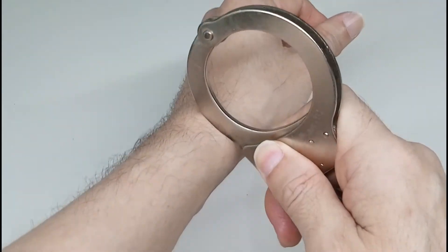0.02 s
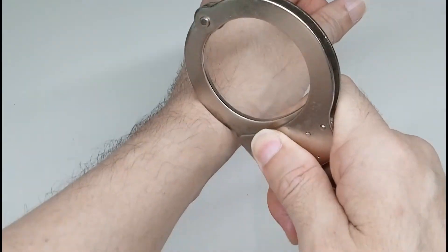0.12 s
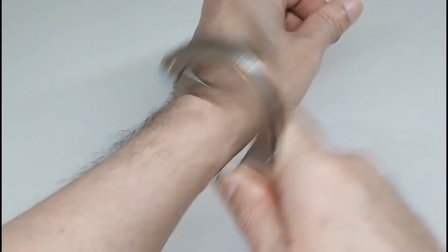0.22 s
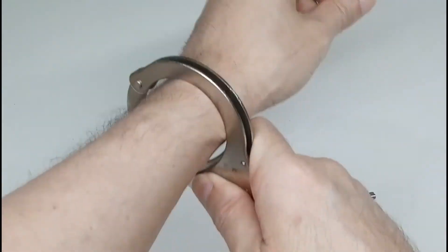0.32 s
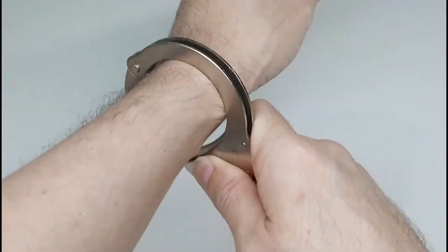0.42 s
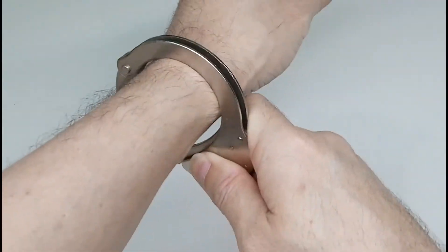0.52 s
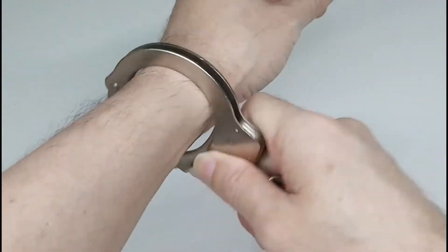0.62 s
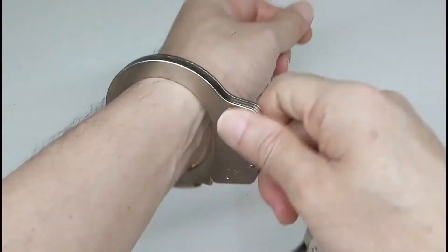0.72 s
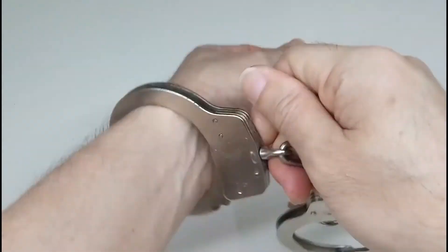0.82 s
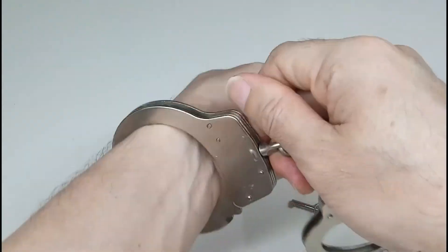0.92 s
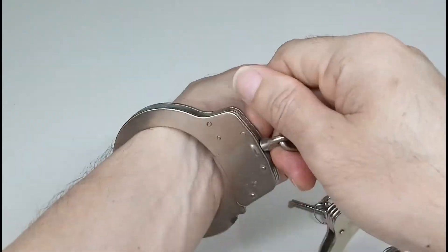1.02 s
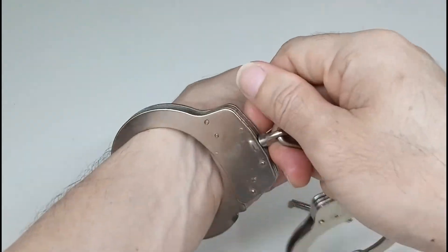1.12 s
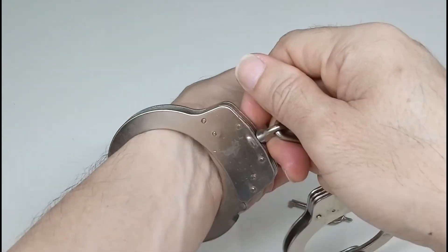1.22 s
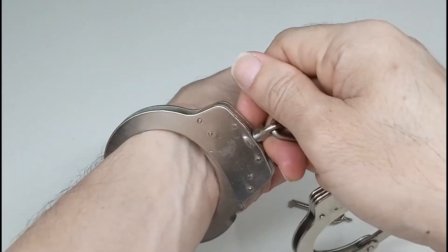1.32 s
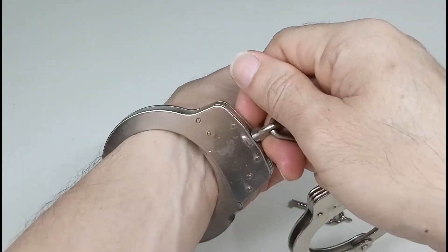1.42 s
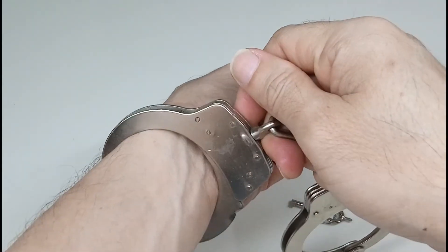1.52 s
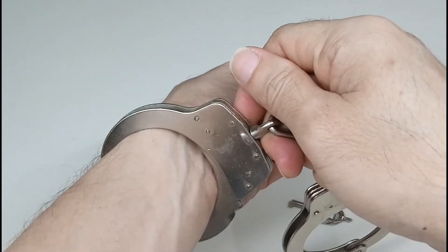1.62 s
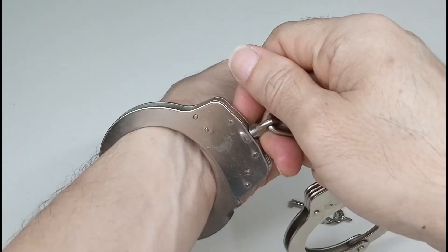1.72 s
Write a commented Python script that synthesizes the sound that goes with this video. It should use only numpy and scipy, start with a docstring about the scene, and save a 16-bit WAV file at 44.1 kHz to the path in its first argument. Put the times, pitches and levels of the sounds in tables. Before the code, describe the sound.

Close to the microphone, a metal handcuff ratchets, knocks against a wrist and locks in one fast, bright burst. It then settles with two faint ticks over the quiet, steady hum of a small room.

```python
"""Handcuff closing on a wrist

A steel handcuff, close to the microphone in a small room. The bow rattles through the ratchet,
knocks against the wrist and snaps into the lock; the steel rings briefly. Two faint ticks
follow as the cuff settles. Behind it all lies steady room noise with a low hum."""
import sys
import numpy as np
from scipy import signal
from scipy.fft import rfft, irfft
from scipy.io import wavfile
from scipy.ndimage import uniform_filter1d

SR = 44100
rng = np.random.default_rng(int(sys.argv[2]) if len(sys.argv) > 2 else 0)


def generate_wav(sig):
    """Save sig (samples, or channels by samples) to the path in sys.argv[1] as 16-bit PCM at SR."""
    pcm = np.round(np.clip(np.atleast_2d(sig).T, -1, 1) * 32767).astype(np.int16)
    wavfile.write(sys.argv[1], SR, pcm)


N = 79380

# The bow's teeth passing the pawl. Each row: start in seconds, clack level in dB, ring level in dB.
TOOTH_HITS = [(.2430, -22.5, -44), (.2466, -19.5, -26.5), (.2508, -17.5, -47.5), (.2560, -19, -25),
              (.2610, -21.5, -41), (.2785, -45, -37.5)]
# The cuff meeting the wrist and rebounding. Each row: start in seconds, clack, ring and thud in dB.
WRIST_HITS = [(0.2897, -24, -17, -29), (0.2938, -24, -26.5, -24), (0.3027, -31, -31.5, -30.5),
              (.3070, -34.5, -23, -51)]
# The pawl catching and the bow striking home. Each row: start in seconds, clack and ring in dB.
LOCK_HITS = [(.3254, -22.5, -31.5), (.3277, -16.5, -22), (.3298, -15.5, -20.5), (.3326, -22.5, -41)]
# The cuff settling. Each row: start in seconds, level in dB, pitch in Hz.
SETTLING_HITS = [(0.7104, -54, 3810), (0.855, -50, 4570), (0.859, -58, 4800)]
# Modes of the steel. Each row: pitch in Hz, gain in dB when it knocks on the wrist,
# gain in dB when metal strikes metal, time to fall 60 dB in seconds.
STEEL_MODES = [(894.8, -36.5, -21.5, 0.091), (1150.8, -19.5, -26, 0.0607), (2120, -12, -5, 0.026),
               (2735.4, -21.5, -3, 0.0334), (3180, -10, -8.5, 0.047), (3563, -3, 0, 0.048),
               (3627, -13, 1.5, 0.054), (3720.4, -21, -17.5, 0.412), (3751, 1, -17, 0.066),
               (4045, -13.5, -5.5, 0.05), (4181.6, -7.5, -2.5, 0.0573), (5164, -12.5, -11, 0.062),
               (5542, -34, -13, 0.082), (9300, -31, -18, 0.074), (13630, -39.5, -20.5, .055),
               (14930, -23.5, -8, 0.038)]
# Low modes of the cuff on the wrist. Each row: pitch in Hz, gain in dB, time to fall 60 dB in seconds.
WRIST_MODES = [(175, -1.5, 0.058), (243, 2, 0.058), (411, -6, 0.034)]
# Spectra of the three kinds of clack and of the thud. Each row: frequency in Hz, relative level in dB.
TOOTH_SPECTRUM = [(150, -21.5), (790, -18), (895, -6), (990, -21.5), (1800, -11), (2800, -6), (4100, -1.5),
                  (5700, -0.5), (7600, -16), (10400, -14), (12800, -20), (15000, -15)]
KNOCK_SPECTRUM = [(70, -28.5), (420, -14), (850, -17), (1150, -12), (1500, -8.5), (2300, -8.5), (3700, 0.5),
                  (5600, -6.5), (7000, -8.5), (7900, -18.5), (13500, -20.5), (14800, -18)]
LOCK_SPECTRUM = [(60, -35.5), (100, -18), (150, -7), (300, -17), (700, -19), (1400, -24), (2050, -3.5),
                 (2900, 1), (5400, -2), (7000, -9.5), (8500, -17.5), (13000, -18.5), (15000, -15)]
THUD_SPECTRUM = [(60, -34), (100, -22.5), (140, -5), (230, -0.5), (330, -9.5), (440, -5.5), (800, -9.5),
                 (2000, -45), (8000, -93.5)]
# Spectra of the reflections and of the room noise. Each row: frequency in Hz, relative level in dB.
REFLECTION_SPECTRUM = [(100, -13), (400, -7), (1000, -1.5), (2200, -7.5), (3600, -3.5), (6000, 1),
                       (10000, -1.5), (15000, 3.5)]
ROOM_NOISE_SPECTRUM = [(20, -23.5), (50, -2), (75, -2.5), (125, -4.5), (170, -3.5), (210, 0), (255, -5),
                       (290, 0), (340, -6.5), (480, -4.5), (660, -8.5), (800, -6), (1050, -12), (2200, -19),
                       (4000, -25.5), (6600, -29), (8200, -42), (13500, -42.5), (15000, -32.5)]
# The slight swell of the room noise. Each row: time in seconds, level in dB.
ROOM_NOISE_LEVEL = [(0, -52.5), (.55, -51.5), (.75, -52.5), (1.15, -52), (1.45, -52.5), (1.8, -53)]

ATTACK_S = 0.000584  # rise of every contact
TIME_S, BIN_HZ = np.arange(N) / SR, np.fft.rfftfreq(2 * N, 1 / SR)


def undb(db):
    """Decibels to gain."""
    return 10 ** (np.asarray(db) / 20)


def unit(x):
    """Scale to rms 1."""
    return x / np.sqrt(np.mean(x ** 2))


def gains(spectrum):
    """Gain at every frequency from (Hz, dB) points."""
    hz, db = np.array(spectrum, float).T
    return undb(np.interp(np.log(BIN_HZ + 1), np.log(hz), db))


def colour(x, gain):
    """Minimum-phase filter shaped by the gains; keeps the power of white noise."""
    cepstrum = irfft(np.log(unit(gain) + 1e-6))
    cepstrum[1:N] *= 2
    cepstrum[N + 1:] = 0
    return irfft(rfft(x, 2 * N) * np.exp(rfft(cepstrum)))[:N]


def fade(start, t60, attack):
    """Quick rise at the start time, then a fall of 60 dB every t60 seconds."""
    age = np.maximum(TIME_S - start, 0)
    return (1 - np.exp(-age / attack)) * np.exp(-np.log(1000) * age / t60)


def envelope(hits, t60):
    """The decays of (seconds, dB) contacts, added in power."""
    return np.sqrt(sum((undb(db) * fade(start, t60, ATTACK_S)) ** 2 for start, db in hits))


def chatter(hits, t60, flicker_db=2):
    """Dense uneven micro-impacts that die away after each contact."""
    noise = rng.standard_normal(N)
    flicker = unit(uniform_filter1d(rng.standard_normal(N), size=16))
    return unit(noise * undb(flicker_db * flicker)) * envelope(hits, t60)


def ring(hits, modes, mean_split_hz=43.2, twin_db=-9):
    """Struck modes beat in pairs: the second cheek plate rings slightly out of tune with the first."""
    out, twin_gain = np.zeros(N), undb(twin_db)
    for hz, db, t60 in modes:
        phase = 2 * np.pi * (hz * TIME_S + rng.random())
        split_hz = mean_split_hz * rng.choice([-1, 1]) * (.5 + rng.random())
        drift = 2 * np.pi * split_hz * (TIME_S - hits[0][0])
        pair = (np.sin(phase) + twin_gain * np.sin(phase + drift)) / np.hypot(1, twin_gain)
        out += undb(db) * envelope(hits, t60) * pair
    return out


def metal_clash(contacts, spectrum, t60):
    """Metal on metal, close up, in the ratchet or the lock: bright clacks and the ring of the steel."""
    clack_hits = [(start, db) for start, db, _ in contacts]
    ring_hits = [(start, db) for start, _, db in contacts]
    modes = [(hz, db, decay) for hz, _, db, decay in STEEL_MODES]
    return colour(chatter(clack_hits, t60), gains(spectrum)) + ring(ring_hits, modes)


def wrist_knock(skin_db=-4.5, wrist_db=-5.5):
    """The cuff lands on the wrist: a clack, the ring of the bow and a soft, low thud."""
    clack_hits = [(start, db) for start, db, _, _ in WRIST_HITS]
    ring_hits = [(start, db) for start, _, db, _ in WRIST_HITS]
    thud_hits = [(start, db) for start, _, _, db in WRIST_HITS]
    clack = colour(chatter(clack_hits, t60=0.0555), gains(KNOCK_SPECTRUM))
    bow = ring(ring_hits, [(hz, db, t60) for hz, db, _, t60 in STEEL_MODES])
    skin = colour(chatter(thud_hits, t60=0.0502), gains(THUD_SPECTRUM))
    wrist = ring(thud_hits, WRIST_MODES)
    return clack + bow + undb(skin_db) * skin + undb(wrist_db) * wrist


def settling_ticks(half_width_octaves=0.306):
    """Light touches of metal, damped by the fingers."""
    out = np.zeros(N)
    for start, db, hz in SETTLING_HITS:
        octaves_off = np.log2((BIN_HZ + 1) / hz)
        band = 1 / (1 + (octaves_off / half_width_octaves) ** 4)
        out += colour(chatter([(start, db)], t60=0.038), band)
    return out


def reflections(direct, level_db=-9.5, delay_s=0.008, build_s=0.0149, crossover_hz=8500):
    """The small room's diffuse reflections reach the microphone later; their treble dies sooner."""
    noise = rng.standard_normal(N)
    low = signal.sosfiltfilt(signal.butter(4, crossover_hz, fs=SR, output="sos"), noise)
    low_tail = low * fade(delay_s, t60=0.3497, attack=build_s)
    treble_tail = (noise - low) * fade(delay_s, t60=0.276, attack=build_s)
    tail = colour(low_tail + treble_tail, gains(REFLECTION_SPECTRUM))
    return undb(level_db) * signal.fftconvolve(direct, tail / np.linalg.norm(tail))[:N]


def room_tone(hum_hz=98.16, hum_half_width_hz=11.1, hum_db=-56.5):
    """Room noise that swells a little, and a narrow band of noise heard as a wavering low hum."""
    air = irfft(rfft(rng.standard_normal(2 * N)) * gains(ROOM_NOISE_SPECTRUM))[:N]
    air_db = np.interp(TIME_S, *np.array(ROOM_NOISE_LEVEL).T)
    hum_band = 1 / (1 + ((BIN_HZ - hum_hz) / hum_half_width_hz) ** 2)
    hum = irfft(rfft(rng.standard_normal(2 * N)) * hum_band)[:N]
    return undb(air_db) * unit(air) + undb(hum_db) * unit(hum)


def scene():
    """One microphone: rattle, knock, snap and ticks up close, the room behind."""
    rattle = metal_clash(TOOTH_HITS, TOOTH_SPECTRUM, t60=0.047)
    knock = wrist_knock()
    snap = metal_clash(LOCK_HITS, LOCK_SPECTRUM, t60=0.0317)
    cuff = rattle + knock + snap + settling_ticks()
    return (cuff + reflections(cuff) + room_tone())[None]


def record(dry):
    """The recorder cuts the treble steeply above 15.3 kHz."""
    return signal.sosfilt(signal.ellip(10, .2, 80, 15300, fs=SR, output="sos"), dry)


dry = scene()
out = record(dry)
generate_wav(out)
```